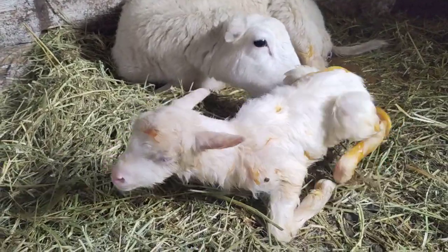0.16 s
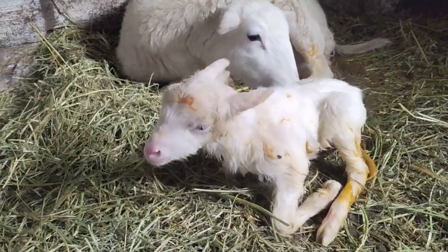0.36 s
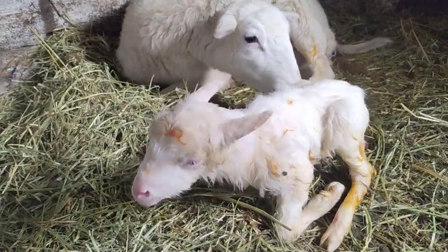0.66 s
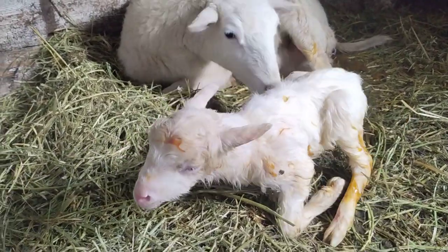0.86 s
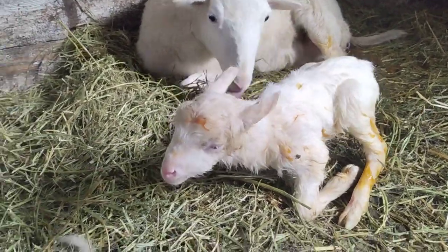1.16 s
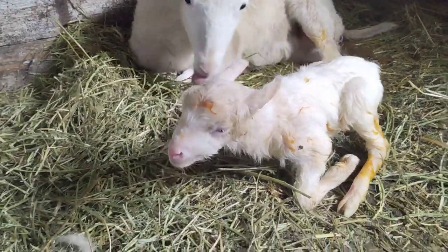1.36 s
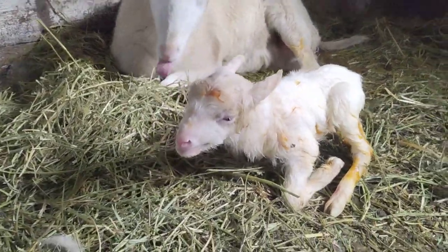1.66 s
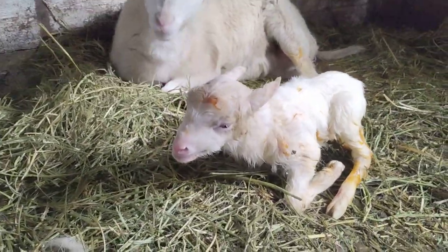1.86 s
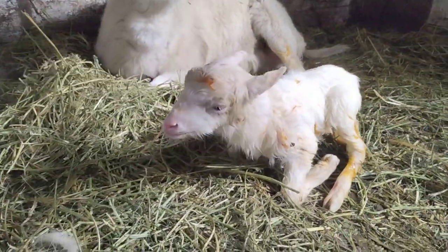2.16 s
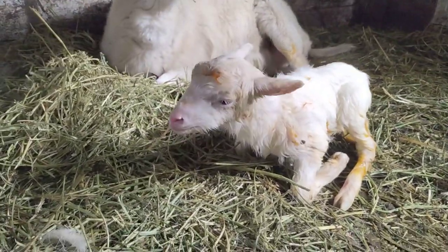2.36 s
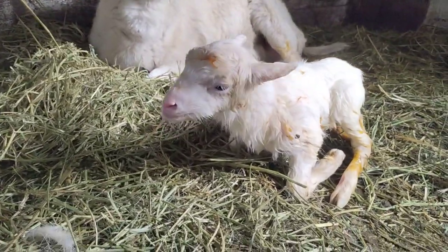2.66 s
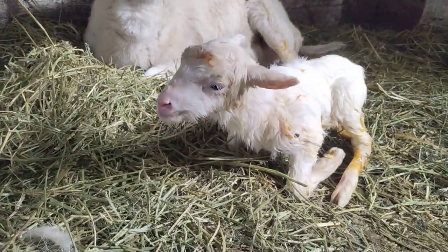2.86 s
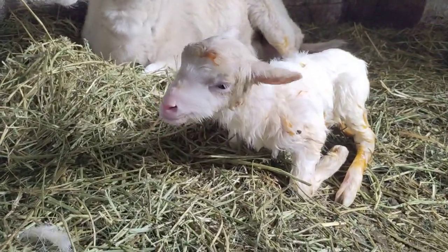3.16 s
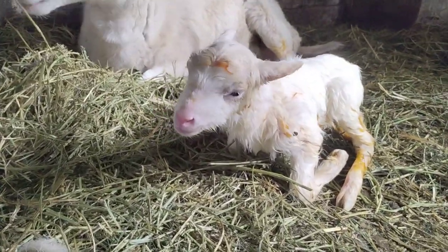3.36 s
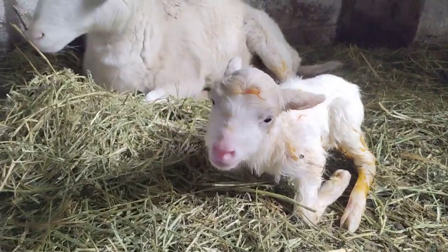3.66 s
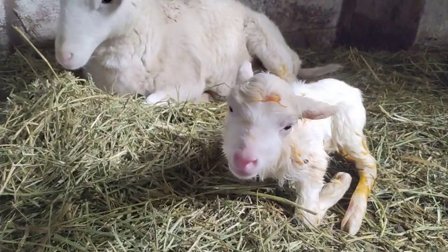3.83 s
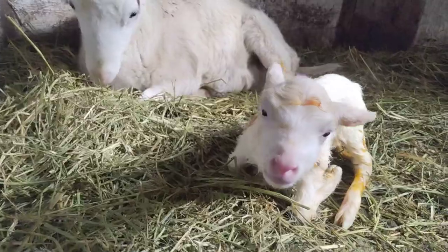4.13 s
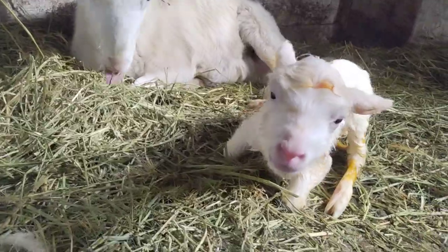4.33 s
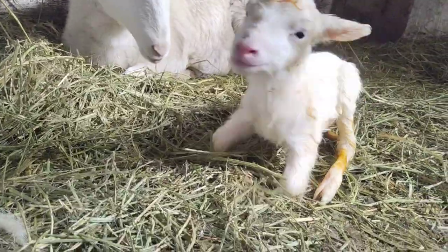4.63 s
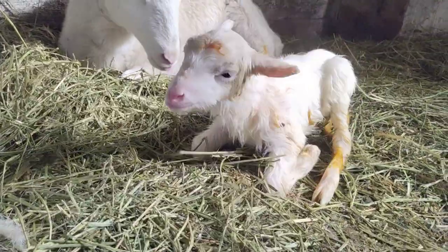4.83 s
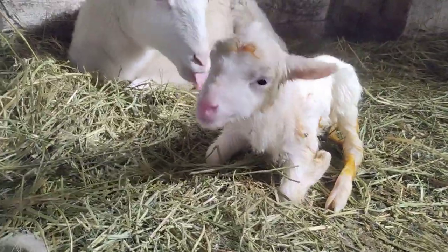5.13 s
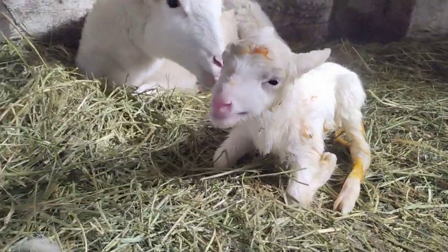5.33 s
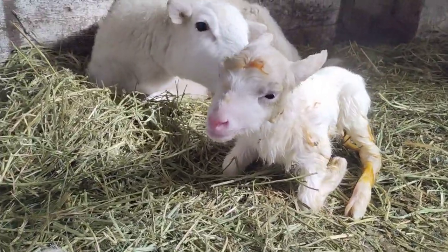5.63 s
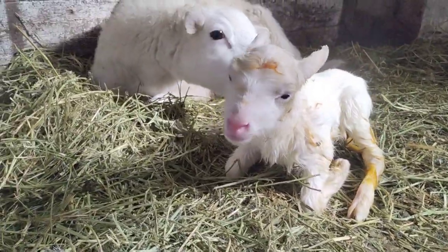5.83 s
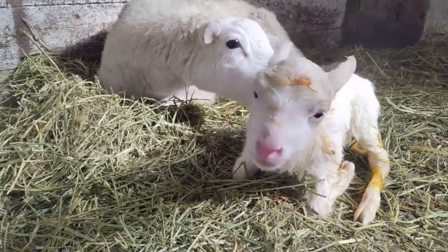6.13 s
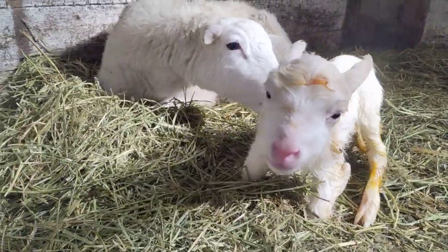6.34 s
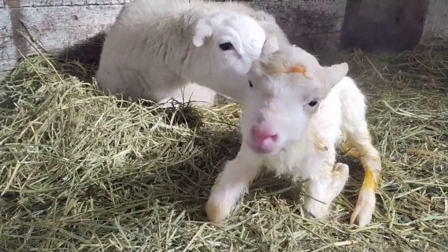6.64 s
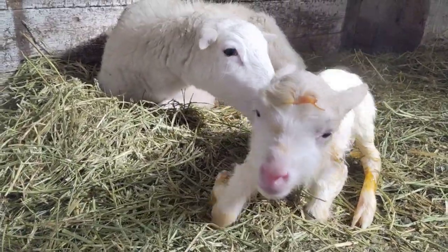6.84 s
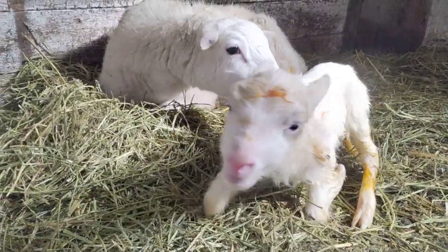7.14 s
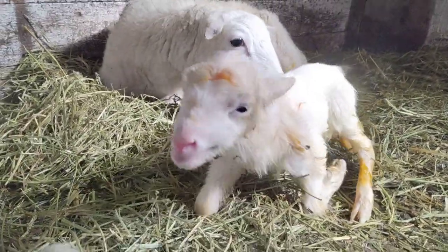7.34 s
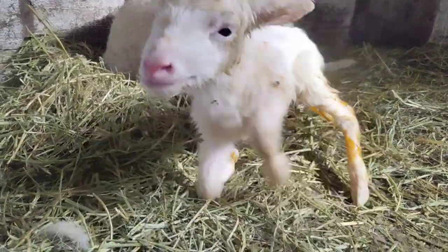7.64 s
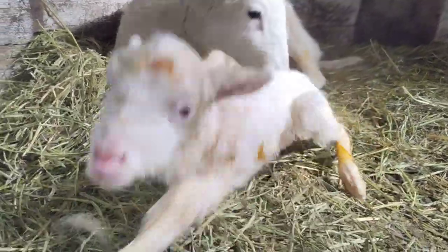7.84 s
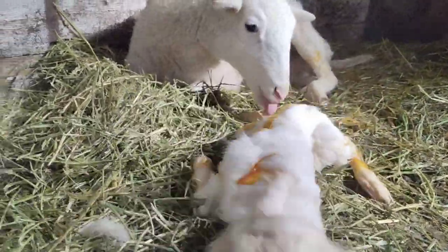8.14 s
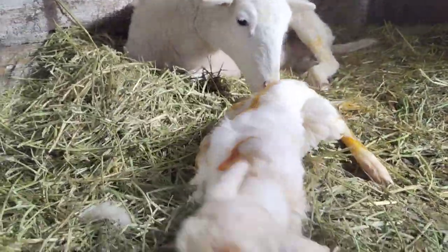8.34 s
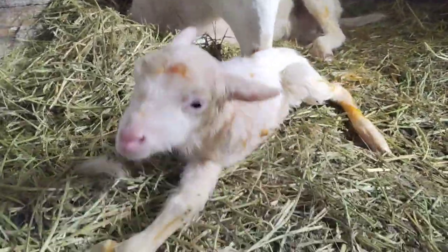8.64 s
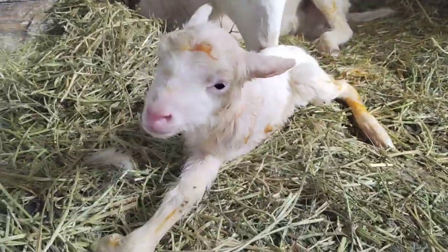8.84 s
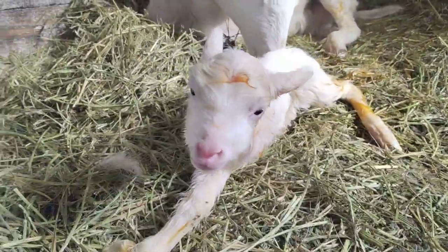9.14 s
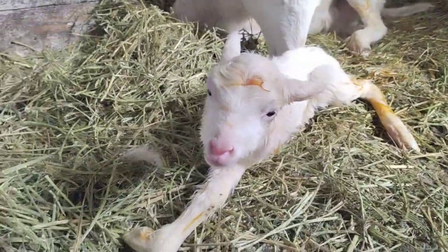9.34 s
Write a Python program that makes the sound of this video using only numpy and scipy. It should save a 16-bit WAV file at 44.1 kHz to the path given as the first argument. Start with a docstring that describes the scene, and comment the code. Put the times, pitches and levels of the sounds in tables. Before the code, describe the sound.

A newborn lamb bleats three times up close in rustling straw, while a ewe answers softly and a distant sheep calls hoarsely.

```python
"""A straw-bedded pen in a barn. Close by, a newborn lamb bleats three times and struggles to its feet.
Its ewe answers softly under the first bleat; later a hoarse sheep calls from the far end of the barn.
Each voice is vocal-fold pulses and breath ringing through a throat; the lamb's opening jaw glides its
vowel. Straw snaps and rustles, a mouth smacks softly and hooves thud on the bedding, over a faint hiss
and a low rumble."""
import sys
import numpy as np
from scipy import signal
from scipy.fft import rfft, irfft, next_fast_len
from scipy.io import wavfile
from scipy.ndimage import uniform_filter1d, minimum_filter1d, map_coordinates

SR = 44100
rng = np.random.default_rng(int(sys.argv[2]) if len(sys.argv) > 2 else 0)


def master(y):
    """Save y as 16-bit WAV."""
    cut = np.clip(np.atleast_2d(y).T, -1, 1)
    pcm = np.round(cut * 32767)  # scale
    wavfile.write(sys.argv[1], SR, pcm.astype(np.int16))


N = 418509
TIME = np.arange(N) / SR


def amp(db):
    """Decibels to gain."""
    return 10 ** (np.asarray(db) / 20)


def unit(x):
    """Scale to rms 1 along the last axis."""
    return x / np.sqrt(np.mean(np.abs(x) ** 2, axis=-1, keepdims=True) + 1e-20)


def between(old, new, part):
    """Morph part (0-1) of the way from old to new."""
    return old + (new - old) * part


def along(points, hz):
    """Read (freq_hz, value) points on a log frequency axis."""
    freqs, values = np.transpose(points)
    return np.interp(np.log(hz + 1), np.log(freqs + 1), values)


def curves(rows, t):
    """Envelopes: each column after time_s, read at the times t."""
    times, *columns = np.transpose(rows)
    return [np.interp(t, times, column) for column in columns]


def span(rows):
    """The sample times that an envelope table covers."""
    return np.arange(rows[0][0], rows[-1][0], 1 / SR)


def wobble(rate, size):
    """Smooth random modulation, rate knots a second."""
    return map_coordinates(rng.standard_normal(N // 20), [np.arange(size) * rate / SR], mode="wrap")


def filtered(x, response):
    """Filter x by a function of frequency."""
    size = next_fast_len(x.shape[-1] + 8192)
    return irfft(rfft(x, size) * response(np.fft.rfftfreq(size, 1 / SR)), size)[..., :x.shape[-1]]


def coloured(x, eq):
    """x through a (freq_hz, gain_db) curve, at rms 1."""
    return unit(filtered(x, lambda hz: amp(along(eq, hz))))


def resonances(hz, modes, scale=1):
    """Gain of steep-sided resonances whose centres move with scale."""
    power = 0
    for centre, width, db in modes:
        detuning = ((centre * scale) ** 2 - hz ** 2) / (hz * width + 1)
        power = power + (amp(db) / (1 + detuning ** 2)) ** 2
    return np.sqrt(power)


def add(track, start_s, x):
    """Mix x into the track at start_s."""
    part = track[round(start_s * SR):][:len(x)]
    part += x[:len(part)]


# Tone of the hiss and of the rumble: freq_hz, gain_db
HISS_EQ = [(150, -28.5), (250, -4.5), (698, -6), (2670, -8), (4490, -10), (5250, -9), (8700, -10.5),
           (11700, -22), (15200, -19.5), (16000, -25)]
RUMBLE_EQ = [(20, -26.5), (55, -11), (95, 1.5), (170, -6), (300, -22), (900, -50.5)]
# Fader rides for the stirring bedding and the rumble: time_s, level_db
STIR_RIDE = [(0.0, -63), (.9, -70.5), (1.25, -65), (2.3, -61.5), (3.4, -66.5), (3.9, -75.5), (4.75, -67.5),
             (5.4, -65.5), (6.25, -68.5), (6.85, -66.5), (7.65, -61), (8.1, -60), (8.4, -65.5),
             (9.49, -62.5)]
RUMBLE_RIDE = [(0, -72.5), (.8, -74.5), (1.2, -62.5), (2.2, -66), (2.6, -68), (3.8, -74.5), (5.5, -62),
               (6.2, -72), (7.5, -68), (9.49, -64.5)]
# How alike left and right are in the barn: freq_hz, correlation
STEREO_LIKENESS = [(100, 0.86), (300, .8), (800, 0.017), (2000, 0.21)]


def barn_air(floor_db=-77, brush_db=-2, drift_db=2.5):
    """A wide, faint hiss that grows as the bedding stirs, over a nearly centred rumble."""
    def mid_side_gains(hz):
        angle = np.arccos(np.clip(along(STEREO_LIKENESS, hz), -1, 1)) / 2
        return np.array([np.cos(angle), np.sin(angle)])

    mid, side = filtered(rng.standard_normal((2, N)), mid_side_gains)
    noise = np.array([mid + side, mid - side])
    hiss_gain = np.hypot(amp(floor_db), amp(curves(STIR_RIDE, TIME)[0] + brush_db))
    rumble_gain = amp(curves(RUMBLE_RIDE, TIME)[0] + drift_db * wobble(7, N))
    return hiss_gain * coloured(noise, HISS_EQ) + rumble_gain * coloured(noise, RUMBLE_EQ)


# Reverb time of the pen's walls: freq_hz, t60_s
WALL_DECAY = [(150, 0.33), (1500, 0.074), (5000, .14), (14000, 0.018)]
# Phase shift as sound bends round the microphone housing: freq_hz, left_lead_rad
LEFT_LEAD = [(200, 1), (1000, -0.44), (1550, -1.38), (2900, 1.4), (4200, 2), (5600, 1.69), (9000, 1.6)]


def in_pen(x, wet_db):
    """A voice reaches left and right out of step; the walls answer, alike on both sides in the bass."""
    hz, t, noise = signal.stft(rng.standard_normal((2, SR // 2)), SR, nperseg=256)
    likeness = along(STEREO_LIKENESS, hz)[:, None]
    noise[1] = noise[0] * likeness + noise[1] * np.sqrt(np.abs(1 - likeness ** 2))
    decay = amp(-60 * t / along(WALL_DECAY, hz)[:, None])
    tail = signal.istft(noise * decay, SR, nperseg=256)[1]
    reverb = signal.fftconvolve(x[None], tail / np.linalg.norm(tail[0]), axes=1)[:, :N]
    direct = filtered(x, lambda f: np.exp(.5j * along(LEFT_LEAD, f) * np.array([[1], [-1]])))
    return (direct + amp(wet_db) * reverb) / np.hypot(1, amp(wet_db))


# Hoof hits: start_s, level_db, pitch_hz, t60_s
HOOF_HITS = [(4.123, -58, 94.4, 0.32), (4.964, -35.5, 96.7, 0.154), (7.999, -26, 109, 0.096),
             (8.022, -42, 107.8, 0.24)]


def hooves(gain_db=4, attack_s=.011, thump_db=-12, upper_hz=180, upper_db=-9):
    """Blows on the padded floor swell softly and boom in its two lowest modes, with a noisy thump."""
    out, t = np.zeros(N), TIME[:SR // 2]
    thump_eq = [(40, -50), (90, -.5), (220, -6.5), (700, -32), (3000, -51)]  # freq_hz, gain_db
    attack = 1 - np.exp(-(t / attack_s) ** 2)
    for start, db, hz, t60 in HOOF_HITS:
        boom = np.sin(2 * np.pi * hz * t) + amp(upper_db) * np.sin(2 * np.pi * upper_hz * t)
        thump = amp(thump_db) * coloured(rng.standard_normal(len(t)), thump_eq)
        add(out, start, amp(db + gain_db - 60 * t / t60) * attack * (boom + thump))
    return out


# Legs sweeping through the straw: centre_s, half_length_s, level_db
LEG_SWISHES = [(1.334, .025, -38), (2.777, .03, -54), (5.455, .009, -46.5), (7.804, .02, -39.5),
               (7.883, 0.016, -45.5), (8.235, 0.06, -49)]
# Straw snaps and a few soft mouth smacks (5.2-5.4 s): start_s, snap_level_db, body_level_db
SNAPS_AND_SMACKS = [(0.179, -45, -60), (0.3765, -42.5, -69.5), (0.5823, -48.5, -57), (0.6709, -34, -61.5),
                    (1.0404, -45, -74.5), (2.4469, -40, -60.5), (2.7106, -42, -68.5), (3.6435, -47.5, -70),
                    (3.6965, -30, -75), (4.0753, -47, -75.5), (4.4542, -43, -72), (5.2029, -44.5, -57.5),
                    (5.2924, -55, -57.5), (5.3687, -54, -52), (5.6524, -34, -60), (5.8583, -42, -61),
                    (6.0723, -41, -59), (6.4631, -32.5, -60), (6.8695, -28, -46.5), (6.9401, -35, -51),
                    (7.9911, -16.5, -41.5), (8.6087, -36, -64)]
# Tone of the bright crunch and of the duller scuff beneath it: freq_hz, gain_db
CRUNCH_EQ = [(1760, -48), (3000, -17.5), (4660, -18), (5180, -9), (7670, -7), (8640, 0), (15000, -30),
             (16000, -22.5)]
SCUFF_EQ = [(300, -9.5), (1100, -7.5), (3000, 1), (4500, -11), (7000, -20)]


def straw_and_smacks(snap_db=-10, crack_db=1, scuff_db=5, rustle_db=-1, swell_db=-29.5, ticks_per_s=1.5):
    """Straw snaps and a few soft mouth smacks, over a light rustle and the sweeps of the lamb's legs."""
    snap_rise_s, scuff_rise_s = .00074, .0077  # the dull body comes in more slowly than the snap
    crack_t60_s, settle_t60_s = .018, .13
    snaps, scuffs, t = np.zeros(N), np.zeros(N), TIME[:SR // 2]
    stir_db, = curves(STIR_RIDE, TIME)
    rustle = amp(stir_db + rustle_db + 3.2 * wobble(25, N))
    swells = [(start, .012, db + swell_db) for start, db, _ in SNAPS_AND_SMACKS]  # around each hit
    for centre, half, db in LEG_SWISHES + swells:
        rustle += amp(db) * np.exp(-((TIME - centre) / half) ** 2)
    crunch = coloured(crackle(spread_db=3.5, rate=940), CRUNCH_EQ)
    scuff = coloured(crackle(spread_db=4.5, rate=590), SCUFF_EQ)
    ticks = []  # lesser stalks at random times, riding on the stirring
    for place, size in rng.random((round(ticks_per_s * N / SR), 2)):
        db = stir_db[int(place * N)] + between(15, 21, size)
        ticks.append((place * N / SR, db, db - 22))
    burst = amp(-60 * t / settle_t60_s) * (1 - np.exp(-t / snap_rise_s))
    crack = 1 + amp(crack_db - 60 * t / crack_t60_s)
    for start, db, body_db in SNAPS_AND_SMACKS + ticks:
        add(snaps, start - snap_rise_s, amp(db + snap_db) * burst * crack)
        add(scuffs, start, amp(body_db + scuff_db) * burst * (1 - np.exp(-t / scuff_rise_s)))
    return np.hypot(snaps, rustle) * crunch + scuffs * scuff


def crackle(spread_db, rate):
    """Stereo noise broken into tiny cracks of unequal size."""
    return rng.standard_normal((2, N)) * amp(spread_db * wobble(rate, N))


def vocal_folds(t, pitch, rough, jitter, shimmer_db):
    """One pulse and one puff of breath a cycle; roughness (0-1) unsettles them and favours the breath."""
    rough = np.clip(rough, 0, 1)
    cycles = np.cumsum(pitch * (1 + jitter * np.sqrt(rough) * wobble(170, len(t)))) / SR
    offset = (cycles % 1 - .5) * SR / pitch  # samples from the nearest closure
    pulses = unit(np.sinc(offset * .8) * np.exp(-(offset / 8) ** 2))
    puffs = unit(rng.standard_normal(len(t)) * (1.2 - np.cos(2 * np.pi * cycles)))
    shimmer = amp(shimmer_db * np.sqrt(rough) * wobble(130, len(t)))
    blend = np.sqrt(1 - rough ** 2) * pulses + rough * puffs
    return unit(shimmer * blend) * signal.windows.tukey(len(t), .03)


# The far sheep's call: time_s, pitch_hz, chest_level_db, mouth_level_db
SHEEP_CALL = [(8.53, 158.3, -61, -87), (8.565, 168.1, -46, -71.5), (8.64, 140.5, -51, -73.5),
              (8.76, 116.8, -38.5, -44), (8.87, 122.3, -46.5, -33.5), (9.0, 124.4, -44.5, -33.5),
              (9.114, 105.6, -47.5, -38.5), (9.23, 107.8, -61.5, -65)]
# Its chest resonances: centre_hz, width_hz, gain_db
CHEST_MODES = [(130, 80, 3.5), (189, 80, 0.5)]
# Its open-mouthed vowel: freq_hz, gain_db
SHEEP_VOWEL_EQ = [(180, -56.5), (300, -12.5), (384, -11.5), (415, -11), (499, 2), (746, 4), (818, -9.5),
                  (985, -10.5), (1380, 5.5), (2100, -7), (2650, -22), (3490, -33), (5300, -14.5),
                  (6470, -28.5), (8160, -22.5), (12000, -38), (15600, -87.5), (22000, -120)]


def far_sheep(chest_gain_db=-4, mouth_gain_db=1):
    """A hoarse call that starts as a hum in the chest before the mouth opens."""
    t, out = span(SHEEP_CALL), np.zeros(N)
    pitch, chest_db, mouth_db = curves(SHEEP_CALL, t)
    source = vocal_folds(t, pitch, rough=.674, jitter=.0406, shimmer_db=2.5)
    hum = unit(filtered(source, lambda hz: resonances(hz, CHEST_MODES)))
    vowel = coloured(source, SHEEP_VOWEL_EQ)
    add(out, t[0], amp(chest_db + chest_gain_db) * hum + amp(mouth_db + mouth_gain_db) * vowel)
    return out


# The ewe's answer, one arch of pitch: time_s, pitch_hz, level_db
EWE_CALL = [(1.27, 168, -66.5), (1.35, 182.1, -49.5), (1.48, 195.2, -43), (1.68, 200.3, -40.5),
            (1.9, 196.3, -42.5), (2.05, 190.3, -45.5), (2.125, 187.2, -48), (2.185, 183, -45.5),
            (2.25, 162, -54), (2.3, 156, -72)]
# Her throat resonances: centre_hz, width_hz, gain_db
EWE_FORMANTS = [(119.7, 270, -9), (570, 210, -3), (768, 130, 4.5), (1800, 570, -3.5), (2550, 880, -12),
                (4020, 2400, -31)]


def ewe(gain_db=3, sag_hz=186.5):
    """A smooth, low answer through a nearly closed mouth; it rasps where the pitch sags."""
    t, out = span(EWE_CALL), np.zeros(N)
    pitch, level_db = curves(EWE_CALL, t)
    rough = .032 + .025 * np.maximum(0, sag_hz - pitch)
    source = vocal_folds(t, pitch, rough, jitter=.03, shimmer_db=9.5)
    vowel = unit(filtered(source, lambda hz: resonances(hz, EWE_FORMANTS)))
    add(out, t[0], amp(level_db + gain_db) * vowel)
    return out


def lamb_folds(t, pitch, level_db, weak_db=-26, sag_hz=267.9, breathy_hz=11100, smear_s=.0019):
    """Clear when pushed, breathy on top; the voice breaks up when weak, sagging or sliding fast."""
    slide_hz_per_s = uniform_filter1d(np.abs(np.gradient(pitch, t)), size=441)
    weakness, sag = np.maximum(0, weak_db - level_db), np.maximum(0, sag_hz - pitch)
    rough = .02 + .13 * weakness + .052 * sag + .00028 * slide_hz_per_s
    pulses = vocal_folds(t, pitch, rough, jitter=.013, shimmer_db=4.5)
    breath = vocal_folds(t, pitch, rough=1, jitter=.01, shimmer_db=2)
    clear = lambda hz: 1 / (1 + (hz / breathy_hz) ** 4)
    source = filtered(pulses, lambda hz: np.sqrt(clear(hz)))
    source += filtered(breath, lambda hz: np.sqrt(1 - clear(hz)))
    # the folds close like a zip, spreading each pulse: smear_s of delay per 4 kHz
    return filtered(source, lambda hz: np.exp(-2j * np.pi * smear_s * hz ** 2 / 8000))


def treble_ripple(age, hz, depth_db=5, spacing_hz=413.6, rate=14, climb_hz_per_s=6000, full_hz=8000):
    """Fine random peaks and notches in dB, deepest in the treble, climb as the mouth moves."""
    place = np.broadcast_arrays(age * rate, (hz - climb_hz_per_s * age) / spacing_hz)
    field = map_coordinates(rng.standard_normal((32, 64)), place, mode="grid-wrap")
    return depth_db * np.minimum(1, hz / full_hz) ** 2 * field


# The lamb's nose and pharynx, then its mouth's highest resonances: centre_hz, width_hz, gain_db
NOSE_FORMANTS = [(255, 190, -17.5), (860, 520, -12), (2110, 900, -14.5)]
EDGE_FORMANTS = [(7464, 890, -12), (8335, 430, 4.5), (9600, 1000, -10), (11400, 1100, -7),
                 (13300, 1100, -6), (14710, 1500, -9)]
# The cluster that moves with the upper ring: centre_ratio, width_hz, gain_db
UPPER_FORMANTS = [(.85, 800, -4), (1.0, 600, 1), (1.13, 400, -13)]


def lamb_throat(t, hz, call, shape, gain_db=-1.03, settle_s=.16, bright_per_db=.39, full_db=-15.5):
    """Gain of the throat over time and frequency: its resonances glide as the jaw opens."""
    (start, opening_s, mouth_hz, mouth_width, mouth_db, nose_db, onset_hz, lower_hz, edge_db,
     upper_shut_hz, upper_open_hz, upper_shut_db, upper_open_db) = shape
    level_db = curves(call, t)[1]
    jaw = np.clip((t - start) / opening_s, 0, 1)  # 0 nearly shut, 1 wide open
    lips = jaw ** .45  # the lips part ahead of the jaw
    tongue = np.clip((t - call[0][0]) / settle_s, 0, 1)  # settles at the start of the bleat

    mouth = resonances(hz, [(between(1151, mouth_hz, lips), mouth_width, 0)])
    nose = amp(nose_db) * resonances(hz, NOSE_FORMANTS)
    low = amp(between(-20, mouth_db, lips)) * unit(np.hypot(mouth, nose))

    lower_shut_hz = between(onset_hz, 3478, tongue)
    lower_ring = resonances(hz, [(between(lower_shut_hz, lower_hz, jaw), between(349, 1200, jaw), 0)])
    upper_ring = resonances(hz, UPPER_FORMANTS, between(upper_shut_hz, upper_open_hz, jaw))
    upper_db = between(upper_shut_db, upper_open_db, jaw) + bright_per_db * (level_db - full_db)
    mid = unit(np.hypot(lower_ring, amp(upper_db) * upper_ring))

    top_hz = between(11800, 16000, jaw)
    cross_mode = resonances(hz, [(.95 * top_hz, 1300, -8)])  # rings across the mouth
    edge = resonances(hz, EDGE_FORMANTS, scale=between(1.02, .98, jaw))
    treble = np.hypot(edge, cross_mode) / (1 + (hz / top_hz) ** 20)
    high = amp(between(-12, edge_db, jaw)) * unit(treble)
    return amp(level_db + gain_db + treble_ripple(t - start, hz)) * np.sqrt(low**2 + mid**2 + high**2)


def moving_throat(x, t, gain_at, size=1024, window=256):
    """Each short slice of x rings through the throat as it is shaped at that moment."""
    hop = window // 2
    starts = np.arange(0, len(x), hop)[:, None]
    slices = np.pad(x, (hop, window))[starts + np.arange(window)] * signal.get_window("hann", window)
    cepstrum = irfft(np.log(gain_at(t[starts], np.fft.rfftfreq(size, 1 / SR)) + 1e-6))
    cepstrum[:, 1:size // 2] *= 2  # minimum phase: the ring follows the pulse
    cepstrum[:, size // 2 + 1:] = 0
    rung = irfft(rfft(slices, size) * np.exp(rfft(cepstrum)))
    return np.bincount((starts + np.arange(size)).ravel(), rung.ravel())[hop:]  # overlap-add


# The quaver of each bleat: time_s, pitch_hz, level_db
FIRST_BLEAT = [(1.28, 281, -55.5), (1.329, 279, -42.5), (1.4, 281.6, -43.5), (1.441, 285.6, -53.5),
               (1.474, 298.3, -32), (1.57, 294, -13), (1.6, 286.7, -20.5), (1.645, 304.7, -13),
               (1.715, 300.1, -11.5), (1.759, 295.1, -17.5), (1.825, 304, -11), (1.875, 289.7, -20),
               (1.931, 284.7, -21.5), (1.965, 257.5, -22.5), (2.0, 232, -44)]
SHORT_BLEAT = [(5.475, 328.5, -40.5), (5.481, 320.8, -14.5), (5.503, 303.5, -12.5), (5.547, 258.5, -34.5),
               (5.565, 263.5, -25.5), (5.592, 268, -24), (5.64, 242.7, -56.5)]
LAST_BLEAT = [(6.972, 272, -41), (6.998, 288.8, -19), (7.05, 282.9, -27.5), (7.073, 294.9, -13.5),
              (7.097, 272.1, -25.5), (7.13, 299.8, -10), (7.21, 296.6, -11.5), (7.25, 289.1, -15.5),
              (7.287, 268.4, -18.5), (7.36, 263.6, -21.5), (7.404, 285.9, -19), (7.465, 281.3, -19),
              (7.51, 264.8, -17.5), (7.546, 238, -37.5)]
# One jaw opening per bleat: start_s, opening_s, mouth_open_hz, mouth_width_hz, mouth_open_db, nose_db,
# lower_onset_hz, lower_open_hz, edge_open_db, upper_shut_hz, upper_open_hz, upper_shut_db, upper_open_db
JAW_MOVES = [(1.52, .31, 1350, 420, -12, -2.5, 4283, 4220, -24.5, 6213, 5620, 3, -14.5),
             (5.42, .12, 1470, 750, -9, 7, 3430, 3540, -19, 5150, 5340, -3.5, 2.5),
             (7.11, 0.29, 1490, 440, -11, -3, 3520, 3786, -24.5, 5210, 5660, -3, 2.5)]


def lamb():
    """Two long bleats and a short double one between them: quavering folds through a gliding throat."""
    out = np.zeros(N)
    for call, shape in zip((FIRST_BLEAT, SHORT_BLEAT, LAST_BLEAT), JAW_MOVES):
        t = span(call)
        source = lamb_folds(t, *curves(call, t))
        add(out, t[0], moving_throat(source, t, lambda when, hz: lamb_throat(when, hz, call, shape)))
    return out


def scene():
    """The lamb close and nearly dry, the adults deeper in the reverb, over bedding and barn air."""
    near = in_pen(lamb(), wet_db=-13)
    farther = in_pen(ewe(), wet_db=2.5) + in_pen(far_sheep(), wet_db=12.5)
    return near + farther + straw_and_smacks() + hooves() + barn_air()


def limiter(x, ceiling=.97, size=265):
    """The gain dips for a few milliseconds around any peak that would pass the ceiling."""
    needed = np.minimum(1, ceiling / (np.abs(x).max(axis=0) + 1e-9))
    return x * uniform_filter1d(minimum_filter1d(needed, 2 * size), size)


# Balance of the two microphone ports: freq_hz, left_minus_right_db
PORT_BALANCE = [(100, -1.5), (300, 4), (700, -0.5), (1250, 3), (1900, -6), (2500, -3), (3400, -6),
                (4500, -5), (5700, -8.5), (7000, 1), (9000, 18), (11500, 10), (15000, 2)]


def record(dry, low_cut_hz=32, high_cut_hz=15900):
    """Two microphone ports resonate differently and lose the deepest bass; then limiter and high cut."""
    def ports(hz):
        tilt = amp(along(PORT_BALANCE, hz))
        pan = np.array([tilt, np.ones_like(tilt)]) * np.sqrt(2 / (1 + tilt ** 2))
        return pan * hz / np.hypot(hz, low_cut_hz)

    return filtered(limiter(filtered(dry, ports)), lambda hz: hz < high_cut_hz)


dry = scene()
out = record(dry)
master(out)
```